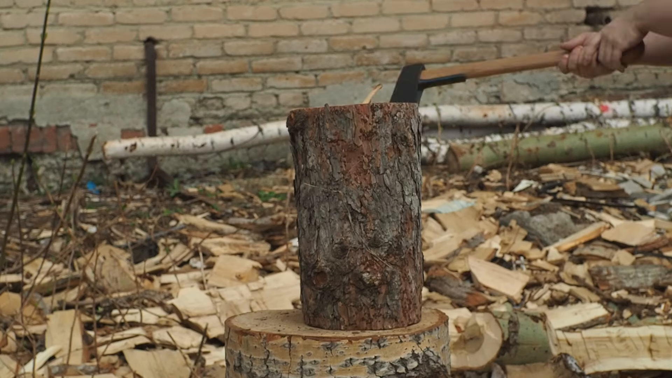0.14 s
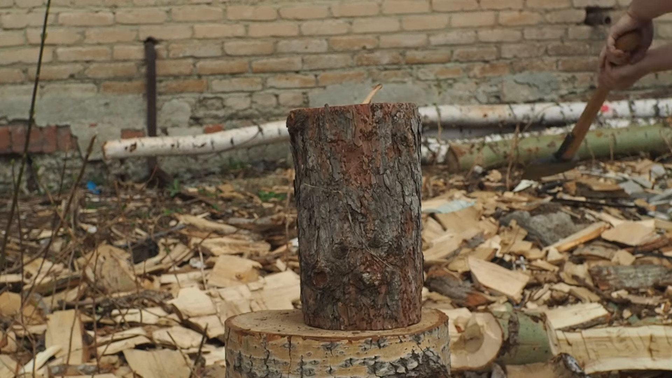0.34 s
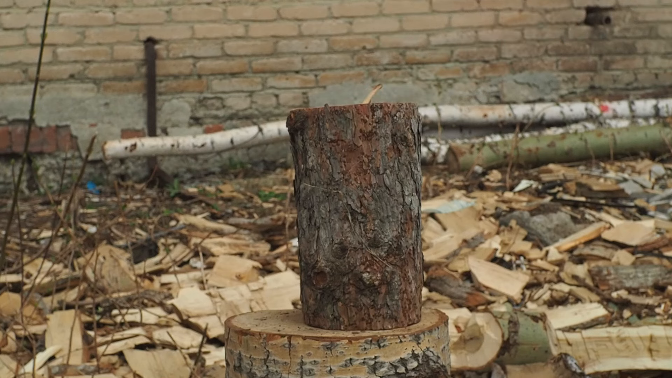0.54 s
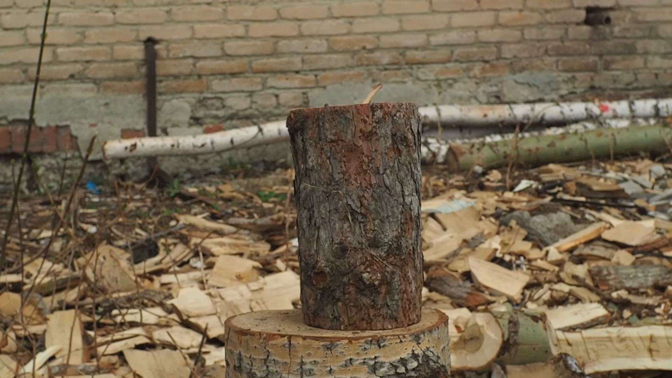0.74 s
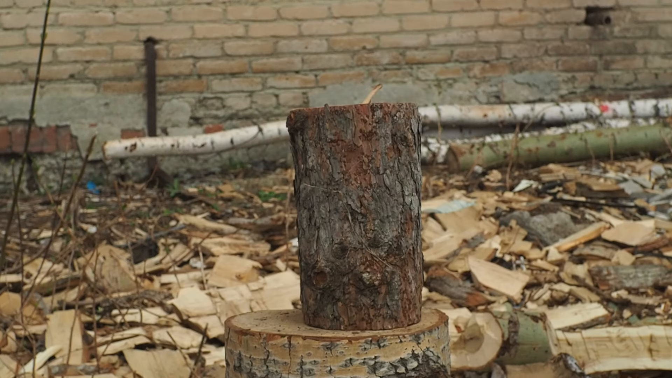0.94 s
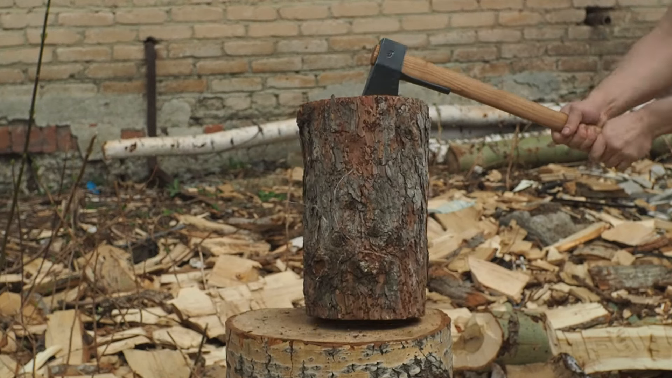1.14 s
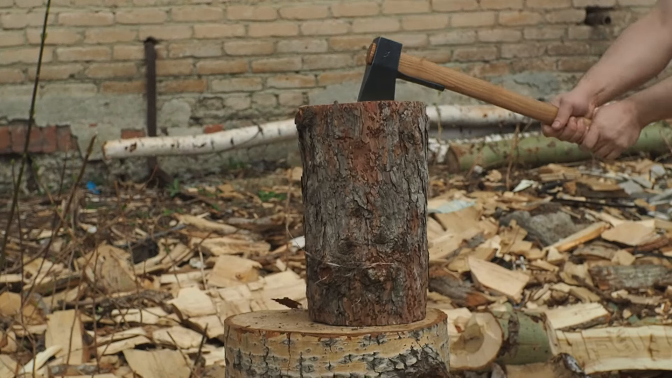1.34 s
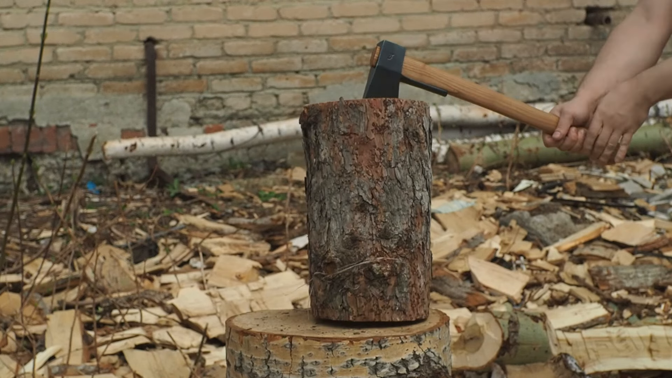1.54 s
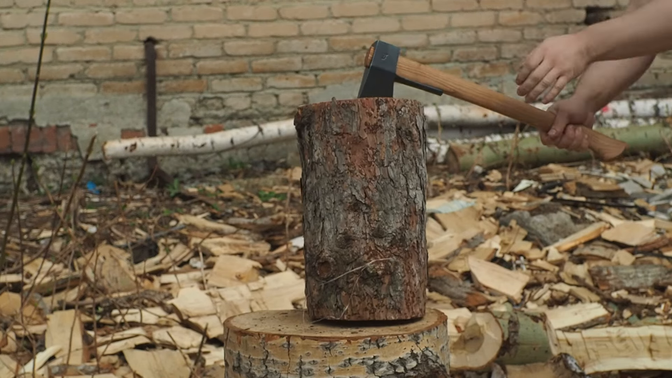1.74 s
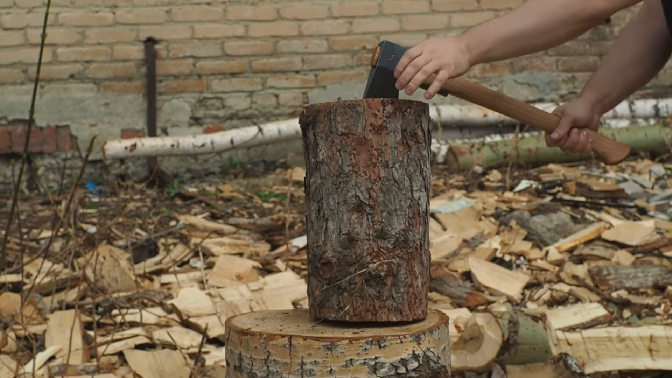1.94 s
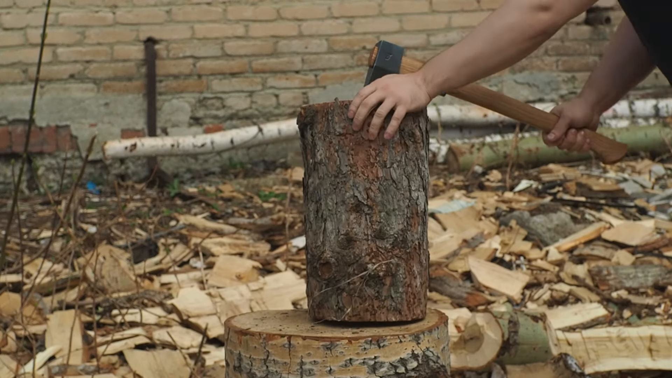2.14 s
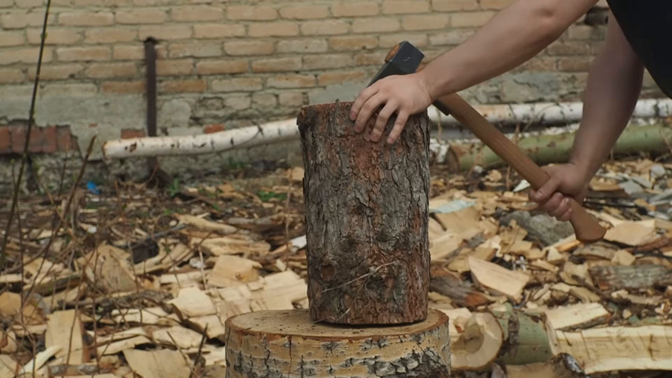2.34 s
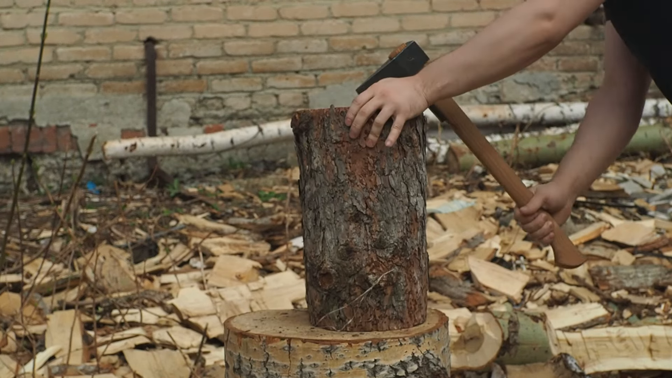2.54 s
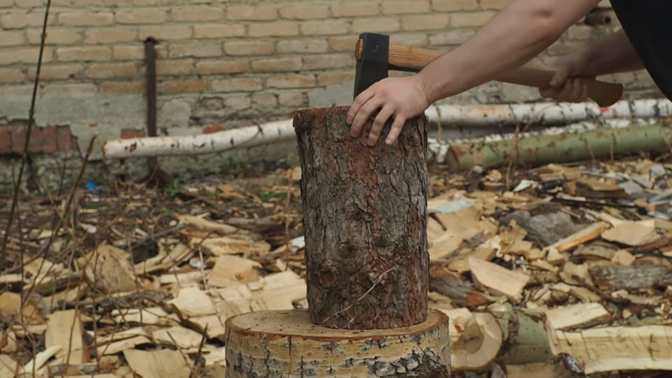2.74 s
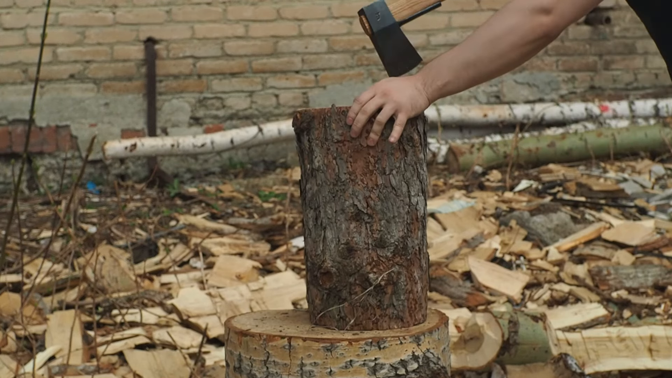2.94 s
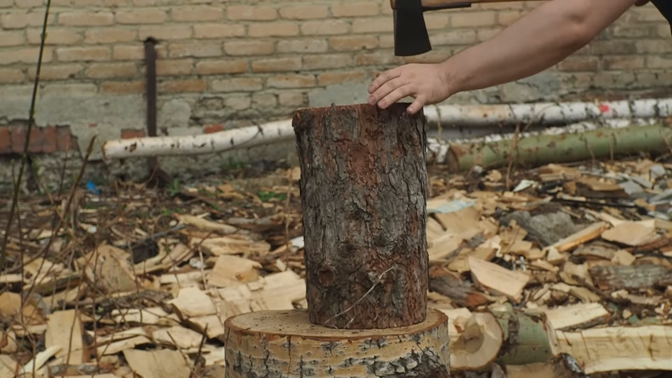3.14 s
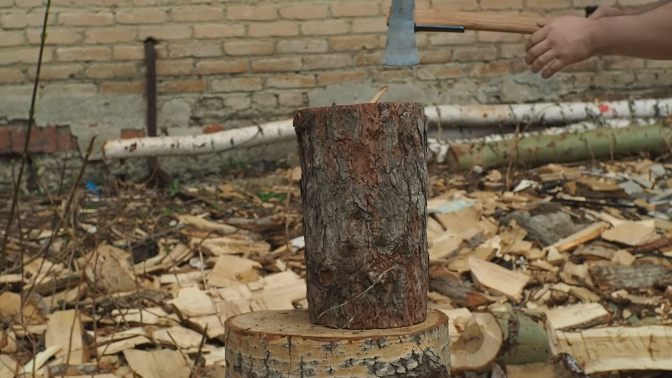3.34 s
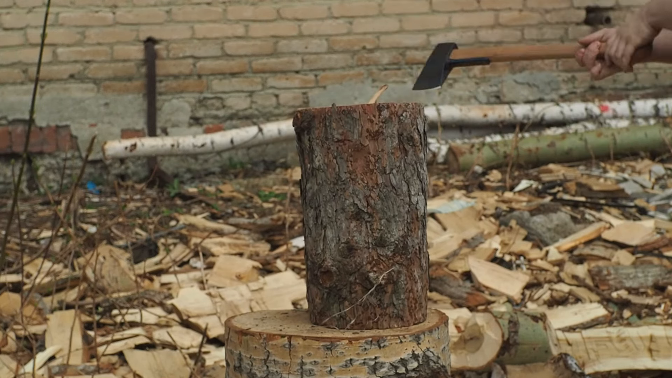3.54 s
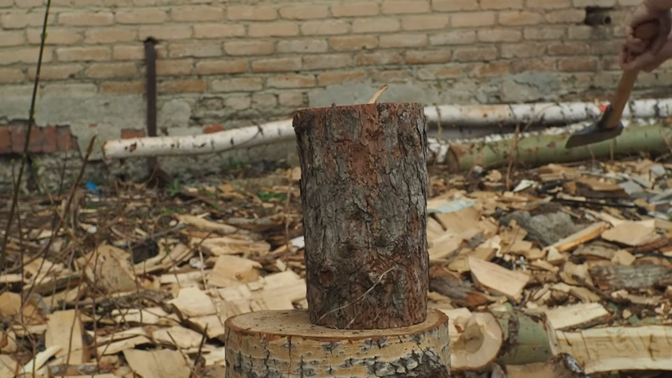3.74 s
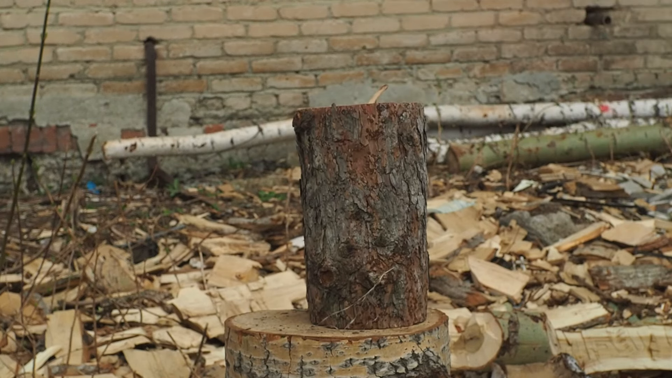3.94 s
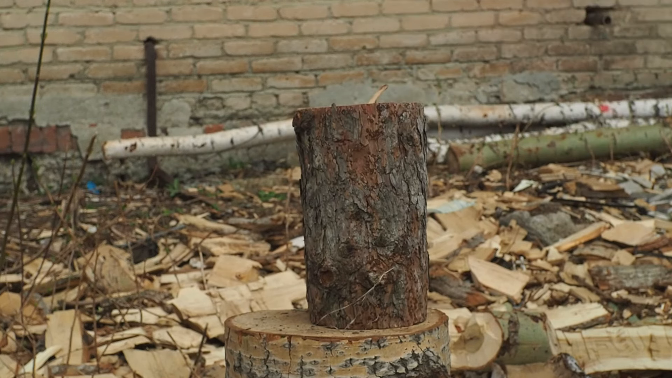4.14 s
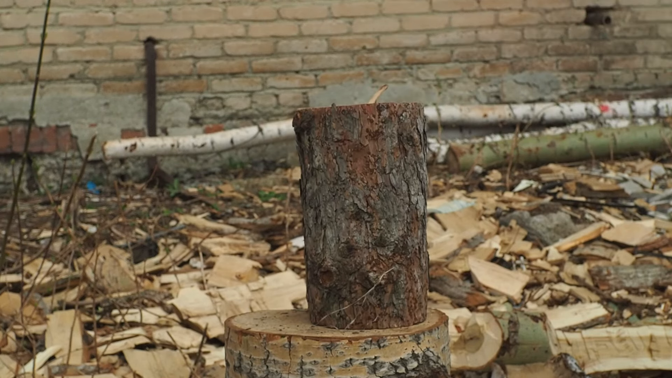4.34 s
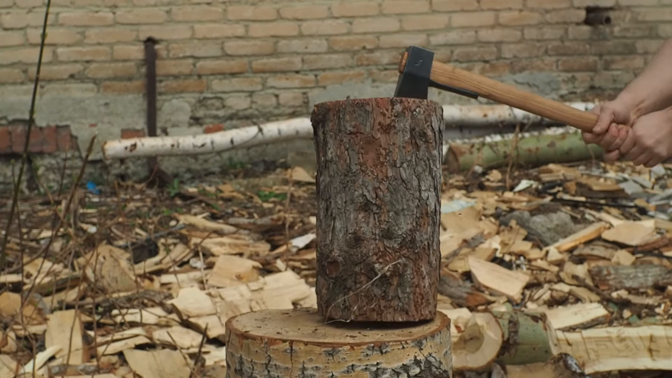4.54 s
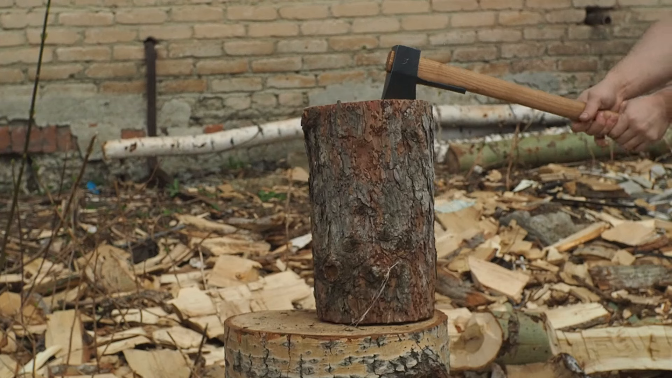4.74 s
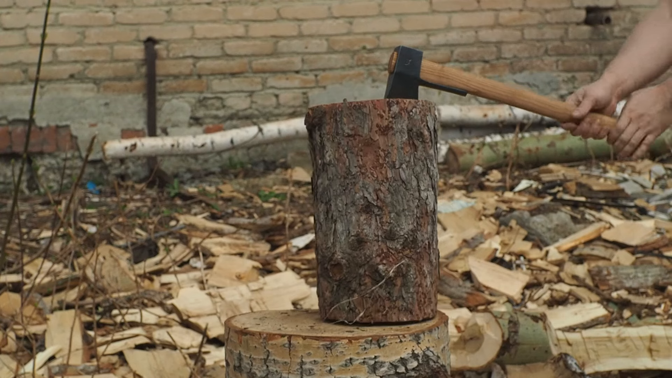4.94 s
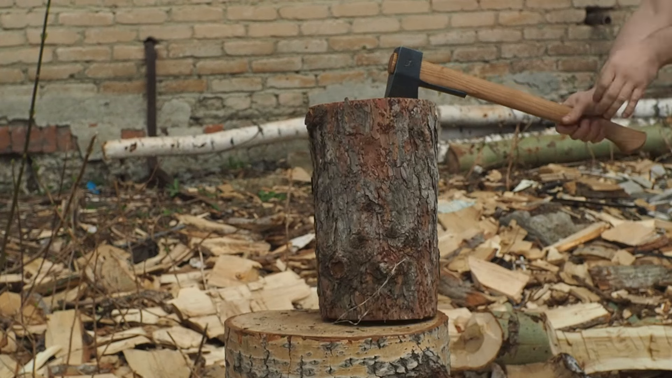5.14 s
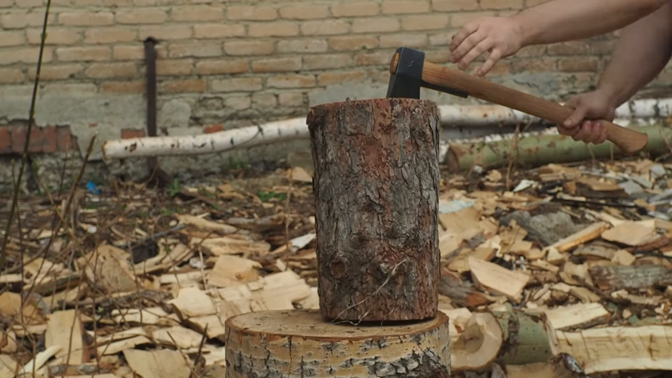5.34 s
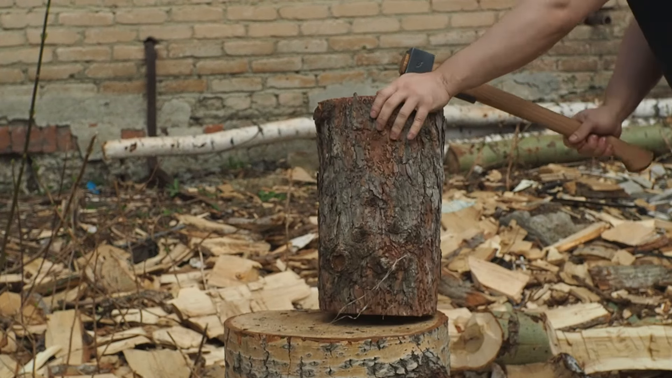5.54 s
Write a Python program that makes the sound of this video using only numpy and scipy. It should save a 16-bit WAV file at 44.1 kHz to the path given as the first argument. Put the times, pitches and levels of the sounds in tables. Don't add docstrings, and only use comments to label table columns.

```python
import sys
import numpy as np
from scipy import signal
from scipy.fft import rfft, irfft
from scipy.io import wavfile
from scipy.ndimage import uniform_filter1d

SR = 44100
rng = np.random.default_rng(int(sys.argv[2]) if len(sys.argv) > 2 else 0)


def field_ratio(decibels):
    return 10 ** (np.asarray(decibels, dtype=float) / 20)


def persist_wave(psi):
    counts = np.round(np.clip(psi, -1, 1) * 32767).astype(np.int16)
    wavfile.write(sys.argv[1], SR, np.atleast_2d(counts).T)


N = 246518
TAIL = int(.7 * SR)
WALL_TRIP_S = .0258
OPPOSITE = np.array([[1], [-1]])

# (time [s], edge bite [dB], crack [dB], crack 60 dB decay [s], body [dB], fibre tear [dB])
BLOWS = [
    (1.1035, -13, -1, 0.024, -6.5, -28),
    (4.4818, -12.5, -2.5, 0.022, -7, -11.5),
]
# (pitch [Hz], level [dB], 60 dB decay [s])
LOG_MODES = [
    [(536, -4.5, 0.052), (844, 0, 0.037), (950, -13, 0.023), (1180, -7.5, 0.043), (1400, -5, 0.04),
     (1580, -15, 0.025), (1850, -17, 0.016), (2600, 1, 0.017), (3110, -6, 0.042), (3700, -20, 0.024),
     (4290, -4.5, 0.029)],
    [(541, 2, 0.086), (690, -7, 0.044), (806, -12, 0.027), (1026, -5.5, 0.025), (1130, -10, .03),
     (1427, -6, 0.029), (1500, -2, 0.0057), (1550, -7, 0.022), (1900, -3, 0.021), (2120, -9, 0.026),
     (3590, -2, 0.0079), (4550, -11, 0.028), (5260, -14, .02)],
]
# (pitch [Hz], level [dB], 60 dB decay [s])
BLOCK_MODES = [
    [(161.4, -14.5, 0.14), (326, -15, 0.067), (376, -12.5, 0.077)],
    [(171, -7, 0.098), (310, -13, 0.07), (385, -24, .05)],
]
# (pitch [Hz], level [dB])
CRACK_TONE = [
    [(300, -23), (1000, -0.5), (3000, 5.5), (5000, -0.5), (6900, 4), (10000, -8.5), (13500, -7),
     (16000, -19)],
    [(300, -10), (1000, -1.5), (2000, 2), (3000, -10), (4200, 0), (7200, -4.5), (11000, -10), (13600, -1.5),
     (16000, -14)],
]
# (pitch [Hz], level [dB])
THUD_TONE = [(60, -61), (150, 0), (600, -1), (900, -17.5), (2000, -33)]
# (pitch [Hz], level [dB])
LITTER_TONE = [(500, -22), (1200, 11), (2500, -6), (4500, -2), (9000, -21)]
# (pitch [Hz], level [dB])
WALL_TONE = [(150, -35), (600, -10), (1100, -1.5), (1600, -5), (4500, -1), (8000, -7.5), (15000, -13)]
# (pitch [Hz], level [dB], 60 dB decay [s])
YARD_BANDS = [(139, -32.5, 0.42), (300, -29.5, 0.61), (500, -27, 0.5), (1000, -18.5, 0.4),
              (1730, -27.5, 0.49), (2780, -25, 0.52), (4430, -26, 0.26), (7100, -29, 0.15),
              (12000, -44, 0.15)]
# (pitch [Hz], level [dB])
LATE_WASH_TONE = [(400, -38.5), (750, 4), (1000, 3.5), (1200, 3.5), (1400, -24), (3000, -41)]
# (pitch [Hz], level [dB], 60 dB decay [s])
FENCE_MODES = [
    [(795, -12, 0.048), (890, -1, 0.074), (1020, -3, .04), (1138, -3, 0.077)],
    [(795, -14, .04), (906, -10, .04), (1020, 2.5, 0.051), (1157, -5, 0.086)],
]
FENCE_PUSHES = [
    [-16, -19, -26, -33, -35, -33, -29, -29, -30, -34, -32, -29, -33, -35, -38, -40, -43],
    [-18, -19, -33, -35, -37, -34, -36, -29, -32, -31, -33, -28, -37, -32, -44, -42, -45],
]
# (pitch [Hz], left minus right [dB])
PORT_BALANCE = [(60, -5), (110, 2), (200, 2), (380, 1.5), (700, 0.5), (1290, 1.5), (2380, 1), (4400, -1.5),
                (8120, 4), (15000, -9.5)]
# (pitch [Hz], left lead [radians])
PORT_PHASE = [(0, 0.13), (1500, -0.31), (6000, -0.67), (9000, -1.57), (16000, -2)]
# (pitch [Hz], left minus right [dB])
WALL_BALANCE = [(200, 0), (2500, 2.2), (4500, 3.5), (7000, 3.5), (9500, 10), (13000, -5)]
# (pitch [Hz], left lead [radians])
WALL_PHASE = [(0, 0.096), (2200, 0.59), (3100, 2), (6500, 1.4), (13000, 1.9)]
# (loudest time [s], level [dB], time to swell 20 dB [s], time to die 20 dB [s], dryness [dB])
SCUFFS = [(0.045, -51.5, 0, 0, -7.5), (.196, -47.5, 0.1, .2, 0), (0.245, -43, 0.15, 0.14, -1.5),
          (0.43, -57, 0.5, 0, 0), (0.52, -44.5, 0.04, 0.07, -3.5), (0.595, -43.5, 0.12, 0.13, 0.5),
          (1.04, -56, 0.2, 0.5, 2), (1.33, -47.5, 0.35, 0.33, -8), (1.596, -47.5, 0.2, 0.17, 0),
          (1.73, -53, -0.1, 0.4, 2), (1.901, -40, 0.03, 0.1, -2), (1.93, -41, 0.08, 0.04, -1),
          (1.965, -48, 0.13, 0.13, 1.5), (2.147, -46, 0.012, 0.23, 3), (2.2, -44.5, .1, 0.23, -0.5),
          (2.26, -40, 0.18, 0.14, 0), (2.39, -46.5, 0.25, 0.16, 2), (2.8, -50, 0, 0, 1.5),
          (3.106, -41, -0.09, 0, 11), (3.4, -49, 0.01, 0.2, -4), (3.585, -46, 0.08, 0.11, 0),
          (3.842, -42.5, 0.03, 0.02, -2), (3.901, -44.5, 0.1, 0.15, -0.5), (4.95, -51.5, 0.7, 0.35, -0.5),
          (5.234, -39.5, 0.01, 0.24, 2), (5.326, -45.5, 0.13, 0.25, -1.5), (5.57, -45.5, 0.05, .1, 2.5)]
# (pitch [Hz], level [dB])
SCUFF_TONES = [
    [(180, -34), (300, -8.5), (402, -18.5), (445, -9), (1900, -11), (2470, -24), (4180, -120)],
    [(1060, -30), (1800, -4.5), (3040, -3), (3600, -0.5), (6310, -7.5), (7500, -5), (9750, -50),
     (16500, -120)],
    [(4120, -38), (7000, -6.5), (8280, 5.5), (11300, 1.5), (12200, -4), (14000, 6), (15700, -6.5)],
]
# (pitch [Hz], left minus right [dB])
SCUFF_BALANCE = [(60, 9), (110, -4.5), (200, -2.5), (380, 1.5), (700, 0.5), (1290, 0.5), (2380, 0),
                 (4400, -1), (8120, 6), (15000, -9.5)]
# (pitch [Hz], left lead [radians])
SCUFF_PHASE = [(0, 0), (3300, -1.5), (6500, -1.5), (12000, -5), (16000, -5)]
# (time [s], peak level [dB], middle pitch [Hz], bright part [dB])
TICKS = [(0.0563, -37.5, 2730, -17), (0.1905, -35, 3700, 0), (0.2318, -31, 3300, -6),
         (0.4262, -28, 2800, -25), (0.5125, -28, 3580, -4), (0.5973, -21, 2580, -1),
         (0.6034, -20, 2030, -10), (1.3186, -36, 7800, -5), (1.339, -28.5, 3430, 0), (1.578, -36, 2600, 7),
         (1.6867, -34, 5600, -15), (1.6995, -36, 2600, -16), (1.859, -32, 4200, -5),
         (1.8956, -23, 5150, -4), (1.9182, -20.5, 5000, -20), (2.1448, -29, 2070, -14),
         (2.2516, -23, 3880, -16), (2.2885, -25.5, 5260, -12), (2.4356, -35.5, 2090, 2),
         (3.1057, -29.5, 7860, -13), (3.402, -33, 2060, -19), (3.8373, -19, 3270, -8),
         (3.8915, -23.5, 3740, -13.5), (3.594, -27.5, 5200, -8), (4.918, -30.5, 5000, -7),
         (5.2312, -30.5, 2200, 4), (5.246, -35, 2980, 0), (5.2865, -32.5, 2280, 0),
         (5.3414, -21.5, 3270, -26), (5.5615, -30, 3280, -14)]
# (time [s], peak level [dB], pitch [Hz], 60
# dB decay [s])
SNAPS = [(1.6994, -24.5, 1480, 0.017), (1.1096, -11, 3700, .012), (1.1131, -11.5, 1380, .03),
         (4.468, -19.5, 3800, 0.016), (4.47, -18, 6500, .015), (4.484, -13, 5900, 0.017),
         (4.4850, -15, 13600, .01), (1.1305, -15, 1300, .02), (1.131, -21, 3200, .015),
         (1.1555, -18, 1070, .025), (1.167, -19, 1400, .02), (4.5095, -15, 3800, .015),
         (4.4995, -19, 3400, .012), (0.0585, -31, 9500, .008), (1.182, -20, 1400, .02),
         (1.121, -19, 3500, .012), (4.5165, -19, 2500, .015), (4.596, -28, 3600, .015),
         (4.587, -27, 4000, .02)]
# (time [s], peak level [dB], pitch [Hz], 60 dB decay [s])
KNOCKS = [(0.058, -29.5, 690, 0.049), (0.511, -34, 340, 0.06), (.515, -33, 624, 0.043),
          (0.599, -36, 830, 0.065), (1.897, -27, 453, 0.05), (1.904, -26, 1070, 0.07),
          (2.269, -35, 523, 0.062), (3.401, -35.5, 900, 0.045), (3.9025, -22, 380, 0.06),
          (5.2815, -33, 900, .04), (5.262, -34, 1300, .04), (1.896, -27.5, 910, .03),
          (2.204, -33.5, 1000, 0.028), (5.432, -34, 1200, .025), (2.2705, -32, 1500, 0.028),
          (2.252, -33, 800, .03), (4.687, -31, 1050, .03), (3.838, -32, 1330, .03),
          (3.915, -36, 334, 0.025), (5.344, -30, 950, 0.05), (5.4245, -27.5, 1180, 0.051),
          (5.561, -30.5, 1002, 0.062)]
# (time [s], peak level [dB],
# pitch [Hz])
GRAINS = [(.232, -29, 1800), (0.259, -31, 2200), (.283, -33, 1980), (.392, -40, 2200), (1.5844, -31, 5000),
          (1.8638, -31, 3700), (1.868, -34, 3000), (1.9021, -32, 1800), (1.932, -27, 4100),
          (2.004, -38, 2300), (2.1506, -32, 2100), (2.1833, -33, 1900), (2.1903, -34, 1800),
          (2.229, -28, 2210), (2.236, -27, 4100), (2.2708, -26.5, 1550), (2.271, -29, 4970),
          (2.304, -33, 4500), (2.314, -35, 3500), (2.354, -35, 3400), (2.372, -36, 4000),
          (3.407, -42, 2100), (3.414, -39, 1800), (3.59, -30, 3500), (3.6274, -37, 2900),
          (3.906, -29, 4200), (3.932, -35, 1800), (4.370, -34, 3000), (1.161, -19, 4200),
          (1.187, -22, 3300), (1.267, -33, 2100), (4.566, -26, 2500), (4.615, -33, 2700), (4.65, -34, 2600),
          (4.818, -37.5, 2500), (1.7, -24, 2700), (4.7052, -28.5, 4430), (5.2077, -39, 3000),
          (5.2373, -32, 1750), (5.314, -29, 5200), (5.332, -29, 3300), (5.426, -30.5, 2820),
          (5.4315, -32, 1400), (5.5466, -37, 2800), (2.1435, -30, 4500), (2.195, -33, 4000),
          (2.251, -31, 1500), (2.258, -32, 2600), (2.277, -32, 3500), (2.3373, -36, 1500),
          (2.4092, -34.5, 1490), (5.2695, -33, 2300), (5.345, -30, 1600), (5.349, -30, 3500),
          (5.532, -37, 3400), (3.8375, -25.5, 5000), (3.8435, -29, 4700), (1.9065, -26.5, 2000),
          (1.8967, -28, 3300), (4.8175, -34, 4500)]
# (time [s], peak level [dB], pitch [Hz])
SPLINTERS = [(.27, -29, 13000), (.401, -38, 7000), (0.5866, -33, 11000), (.604, -17.5, 9200),
             (.664, -38, 12000), (1.029, -39, 4400), (1.368, -39, 7000), (1.418, -35, 8000),
             (1.445, -27, 6660), (1.532, -34.5, 5400), (1.687, -29, 7500), (1.7257, -32, 9100),
             (1.7375, -31, 9200), (1.9054, -24, 13000), (1.9598, -25, 14000), (2.151, -33, 7500),
             (2.3344, -34, 13500), (2.3798, -31, 14000), (2.38, -27.5, 8500), (2.3966, -37, 13500),
             (2.4844, -33, 7750), (2.536, -43.5, 5500), (2.5717, -38, 7200), (2.684, -39.5, 8500),
             (2.7696, -35, 8000), (2.8767, -44, 9000), (3.025, -43, 4590), (3.1123, -33, 7000),
             (3.3893, -39, 14000), (3.6278, -36, 13500), (3.8415, -27, 13000), (3.849, -33, 8000),
             (4.7043, -35, 12000), (4.818, -28, 7600), (4.8185, -33, 13000), (4.827, -44, 7000),
             (4.8445, -45, 6500), (4.8936, -30, 8500), (4.970, -36, 10000), (4.9752, -27, 12000),
             (5.2462, -23, 7800), (5.286, -19, 14500), (5.3217, -25, 14500), (5.4753, -32, 6200),
             (5.533, -28, 13000)]
# (pitch [Hz], level [dB])
TOWN_TONE = [(15, -29), (25, -20), (54, -12), (128, -2.5), (253, -21), (318, -14.5), (399, -20.5),
             (434, -17.5), (491, -23), (533, -14.5), (616, -27.5), (894, -18.5), (1220, -22.5), (1810, -33),
             (3500, -37), (4550, -53.5), (7700, -120)]
# (pitch [Hz], likeness [limited to 0 to .99 in use])
TOWN_ALIKE = [(60, 0.88), (130, 0.92), (290, 0.89), (640, 0.86), (1410, 0.46), (3100, -0.98),
              (6820, -1.964), (15000, -0.9)]
# (pitch [Hz], left minus right [dB])
TOWN_BALANCE = [(60, 3), (110, 1), (200, 1.5), (380, 1), (700, 1.5), (1290, 1.9), (2380, 0.5), (4400, 0.5),
                (8120, 0.5), (15000, -2.5)]
# (time [s], level [dB])
TRAFFIC = [(0.0, -45.5), (0.8, -47.5), (2.5, -47.5), (3.64, -46), (3.92, -44.5), (4.08, -52.5),
           (4.44, -47.5), (4.7, -50.5), (5.59, -49.5)]
# (pitch [Hz], level [dB])
HISS_TONE = [(2500, -17), (3800, 3.5), (5500, -0.5), (11500, -6.5), (13000, -0.5), (14200, -2), (15700, 1)]
# (time [s], pitch [Hz], level [dB])
DRONE = [(2.5, 105.6, -54), (2.648, 125.8, -40), (2.774, 126.2, -42), (2.92, 106.1, -49), (3.092, 130, -52),
         (3.15, 116, -43), (3.95, 121, -41.5)]


def axe():
    dry, wet = np.zeros((2, N)), np.zeros((2, N))
    yard_levels, litter_levels = (1.5, 1.2), (-19, -18)  # dB, blow by blow
    each_blow = zip(BLOWS, LOG_MODES, BLOCK_MODES, CRACK_TONE, yard_levels, litter_levels)
    for (s, *strength), log, block, crack_tone, yard_db, litter_db in each_blow:
        hit, lead = blow(log, block, crack_tone, *strength)
        start = int(s * SR) - lead
        dry[:, start:][:, :len(hit)] += hit
        dry[:, start:][:, :TAIL] += litter(litter_db)
        wet[:, start:][:, :TAIL] += flutter(hit, lead) + yard(yard_db)
    both = ports(dry, PORT_BALANCE, PORT_PHASE) + ports(wet, WALL_BALANCE, WALL_PHASE)
    no_bass = signal.butter(2, 95, "high", fs=SR, output="sos")
    return signal.sosfilt(no_bass, both) + late_wash() + fence()


def blow(log, block, crack_tone, bite_db, crack_db, crack_t60, body_db, tear_db):
    bite_s, settle_s, block_rise_s = .0034, .022, .009
    lead, t = int(bite_s * SR), np.arange(4096) / SR
    edge = unit(colour(noise(lead), [(3000, -67), (5000, -1), (9000, 7), (15000, -7)]))
    edge = edge * np.linspace(.15, 1, lead) * field_ratio(bite_db)
    crack = unit(colour(noise(4096, rough_db=2.5), crack_tone)) * field_ratio(crack_db) * fade(t, crack_t60)
    tear_tone = [(300, -6), (1200, -5), (4000, 2), (8000, -2), (15000, -21)]
    tear = unit(colour(noise(4096, rough_db=7), tear_tone)) * field_ratio(tear_db) * fade(t, .062)
    log_ring = ringing(log, t) * np.exp(-(t / settle_s) ** 4)
    block_ring = ringing(block, t) * np.minimum(t / block_rise_s, 1)
    thud = unit(colour(noise(4096), THUD_TONE))[0] * fade(t, .056) * field_ratio(-8)
    wobble = field_ratio(2 * walk(730)[:4096])
    body = field_ratio(body_db) * ((log_ring + block_ring) * wobble + thud)
    return np.concatenate([edge[0], crack[0] + tear[0] + body]), lead


def ringing(modes, t):
    return sum(-field_ratio(db) * np.sin(2 * np.pi * hz * t) * fade(t, t60) for hz, db, t60 in modes)


def litter(db):
    delay_s, rise_s, t60_s = .011, .0056, .091
    t = np.arange(TAIL) / SR - delay_s
    pair = .6 * noise(TAIL, rough_db=5.5) + noise(TAIL, rough_db=2.2) * OPPOSITE
    return unit(colour(pair, LITTER_TONE)) * field_ratio(db) * np.clip(t / rise_s, 0, 1) * fade(np.abs(t), t60_s)


def flutter(hit, lead):
    first_db, loss_db, edge_db, even_db = -3, 5.5, -2, -5
    corner_s, corner_gain = .0082, field_ratio((-11, -13))[:, None] * OPPOSITE
    t, out = np.arange(len(hit)) / SR, np.zeros((2, TAIL))
    is_edge = np.arange(len(hit)) < lead
    front = np.array([hit * fade(t, .048) * field_ratio(edge_db * is_edge)])
    for trip in range(1, 7):
        brick = noise(256, channels=2) * fade(t[:256], .0059 * trip) * .26
        brick[:, 0] = 1
        echo = signal.fftconvolve(front, brick, axes=-1) * field_ratio(first_db - loss_db * (trip - 1.5))
        if trip % 2 == 0:
            echo = colour(echo, [(1300, 1.3), (2600, even_db), (6000, even_db), (8000, -1.5)])
        size = echo.shape[1]
        out[:, int(trip * WALL_TRIP_S * SR):][:, :size] += echo
        out[:, int((trip * WALL_TRIP_S + corner_s) * SR):][:, :size] += echo * corner_gain
        front = colour(front, [(3000, -.5), (15000, -1.6)])
    return colour(out, WALL_TONE)


def yard(db):
    t, out = np.arange(TAIL) / SR, 0
    grain = field_ratio(2.2 * walk(250)[:TAIL])
    mid, side = noise(TAIL) * grain, noise(TAIL) * OPPOSITE * grain
    for hz, band_db, t60 in YARD_BANDS:
        band = unit(colour(mid + min(hz / 2600, .75) * side, resonance(hz, sharp=.74)))
        out = out + band * field_ratio(db + band_db) * fade(t, t60)
    return out * np.clip(t / .031, 0, 1)


def fence():
    rise_s, lead_s, patchy_db, drift = .0031, .0022, 1.5, .59
    out, t = 0, np.arange(N) / SR
    early = t[:8192]
    port_lag = np.array([[.2], [-.2]])
    for (s, *_), levels, modes in zip(BLOWS, FENCE_PUSHES, FENCE_MODES):
        pushes = np.zeros(N)
        times = s - lead_s + (1 + np.arange(len(levels))) * WALL_TRIP_S
        pushes[(times * SR).astype(int)] = field_ratio(levels)
        for hz, db, t60 in modes:
            swing = signal.fftconvolve(pushes, fade(early, t60) * np.minimum(early / rise_s, 1))[:N]
            tone = np.sin(2 * np.pi * hz * t + drift * walk(60) + port_lag)
            out = out + field_ratio(db + patchy_db * walk(25.02)) * swing * tone
    return out * field_ratio(-3)


def late_wash():
    corners = np.cumsum([.097, .052, .18, .18])  # delay, attack, hold, release [s]
    t, swell = np.arange(N) / SR, 0
    for (s, *_), db in zip(BLOWS, (-34.5, -37.5)):
        swell = swell + field_ratio(db + np.interp(t - s, corners, [-16, 0, -.5, -20], left=-90, right=-90))
    pair = noise(N) + .37 * noise(N) * OPPOSITE
    return unit(colour(pair, LATE_WASH_TONE)) * swell * field_ratio(-7.5 + 1.5 * walk(160))


def scuff():
    wood_db, dryer_db, rustle_levels, alike = -2, -1.5, (-56, -67.5, -63), .67
    s, db, swell_s, die_s, dry_db = np.transpose(SCUFFS)[..., None]
    t, out = np.arange(0, N + 64, 64) / SR, 0
    shared_db = walk(70) + 2.24 * walk(500)
    before, after = (s - t) / np.maximum(swell_s, .005), (t - s) / np.maximum(die_s, .005)
    shape_db = db - 20 * np.where(t < s, before, after)
    leans = (wood_db - dry_db, 0, dryer_db + dry_db)
    for lean_db, rustle_db, tone in zip(leans, rustle_levels, SCUFF_TONES):
        pair = alike * noise(N, rough_db=3.5) + (1 - alike) * noise(N, rough_db=3.5) * OPPOSITE
        power = np.sum(field_ratio(shape_db + lean_db) ** 2, axis=0) + field_ratio(rustle_db) ** 2
        effort = np.interp(np.arange(N) / SR, t, np.sqrt(power))
        out = out + unit(colour(pair * field_ratio(shared_db + 2.8 * walk(300)), tone)) * effort
    return ports(out, SCUFF_BALANCE, SCUFF_PHASE)


def ticks():
    s, db, middle_hz, bright_db = np.transpose(TICKS)
    wood_scatter, bright_scatter = 2 ** rng.uniform(-.076, .05, (len(s), 2)).T
    t60 = np.full(len(s), .016)
    woody = zip(s, db - 13, 900 * wood_scatter, 2.8 * t60)
    middle = zip(s, db, middle_hz, t60)
    bright = zip(s, db + bright_db, 10500 * bright_scatter, 1.3 * t60)
    out = bursts([*woody, *middle, *bright, *SNAPS], sharp=1.25, rough_db=2.5, snap=8.5, size=2048)
    out = out + bursts(KNOCKS, sharp=1.53, rough_db=2.2, snap=9.5)
    grains = [(*row, .011) for row in GRAINS]
    out = out + bursts(grains, sharp=1.7, rough_db=2.2, snap=5.5, size=1024)
    splinters = [(*row, .012) for row in SPLINTERS]
    splinters = bursts(splinters, sharp=1.19, rough_db=2.5, snap=5.5, size=1024)
    return ports(out, SCUFF_BALANCE, SCUFF_PHASE) + ports(splinters, PORT_BALANCE, PORT_PHASE)


def bursts(rows, sharp, rough_db, snap, size=4096):
    out, t = np.zeros(N + size), np.arange(size) / SR
    for s, db, hz, t60 in rows:
        crackle = noise(size, rough_db) * fade(t, t60)
        crackle[0, 0] = snap
        burst = colour(crackle, resonance(hz, sharp))[0]
        out[int(s * SR):][:size] += burst / np.abs(burst).max() * field_ratio(db)
    return out[:N]


def town():
    alike = np.clip(on_axis(TOWN_ALIKE, N), 0, .99)
    half = field_ratio(on_axis(TOWN_BALANCE, N) / 2)
    mid, side = rfft(noise(N, channels=2)) * np.sqrt([1 + alike, 1 - alike])
    pair = irfft(np.array([(mid + side) * half, (mid - side) / half]), N)
    both = unit(colour(pair, TOWN_TONE)) * field_ratio(-40.5) + unit(colour(pair, HISS_TONE)) * field_ratio(-53.5)
    both[0] = np.roll(both[0], 2)
    low = signal.sosfiltfilt(signal.butter(2, 230, fs=SR, output="sos"), both)
    s, db = np.transpose(TRAFFIC)
    rumble_db = np.interp(np.arange(N) / SR, s, db + 45) + .63 * walk(5.2)
    return low * field_ratio(rumble_db) + (both - low) * field_ratio(.5 * walk(2.45))


def drone():
    t, (s, hz, db) = np.arange(N) / SR, np.transpose(DRONE)
    edge = np.clip(np.minimum(t - s[0], s[-1] - t) / .08, 0, 1)
    hum = np.sin(2 * np.pi * np.cumsum(np.interp(t, s, hz)) / SR)
    return hum * field_ratio(np.interp(t, s, db) - 1.5 + 2 * walk(12)) * edge


def ports(x, balance, phase):
    lead = np.interp(np.arange(N // 2 + 1) * SR / N, *np.transpose(phase))
    half = field_ratio(on_axis(balance, N) / 2) * np.exp(.5j * lead)
    return irfft(rfft(x) * np.array([half, 1 / half]), N)


def noise(size, rough_db=0., channels=1):
    spread = np.minimum(rng.exponential(size=(1, size)), 5.5)
    return unit(rng.standard_normal((channels, size)) * field_ratio(rough_db * spread))


def walk(rate):
    k = int(SR / rate)
    steps = np.repeat(rng.standard_normal(N // k + 1), k)
    return .94 * uniform_filter1d(uniform_filter1d(steps, k), k)[:N]


def fade(t, t60):
    return np.exp(-np.log(1000) * t / np.maximum(t60, .002))


def unit(x):
    return x / np.sqrt(np.mean(x ** 2))


def resonance(hz, sharp):
    skirt = ((1 / 9, -60), (1 / 3, -24), (1 / 1.4, -6), (1, 0), (1.4, -6), (3, -24), (9, -60))
    return [(hz * step, db * sharp) for step, db in skirt]


def colour(x, table):
    cepstrum = irfft(on_axis(table, size=2048) * np.log(10) / 20)
    cepstrum[1:1024] *= 2
    cepstrum[1025:] = 0
    response = np.atleast_2d(irfft(np.exp(rfft(cepstrum))))
    return signal.fftconvolve(x, response, axes=-1)[..., :x.shape[-1]]


def on_axis(table, size):
    hz, value = np.transpose(table)
    return np.interp(np.log(np.arange(size // 2 + 1) * SR / size + 1), np.log(hz), value)


def scene():
    return axe() + scuff() + ticks() + town() + drone()


def band_limit(x):
    return signal.sosfilt(signal.butter(12, 15810, fs=SR, output="sos"), x)


def record(dry):
    no_top = signal.ellip(8, .2, 50, 15800, fs=SR, output="sos")
    clipped = np.clip(signal.sosfilt(no_top, dry), -.97, .99)
    no_deep_bass = signal.butter(1, 30, "high", fs=SR, output="sos")
    mix = signal.sosfilt(no_deep_bass, clipped) - .0043
    return band_limit(mix)


dry = scene()
out = record(dry)
persist_wave(out)
```